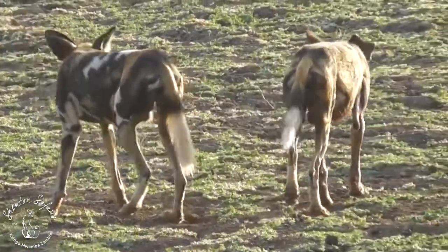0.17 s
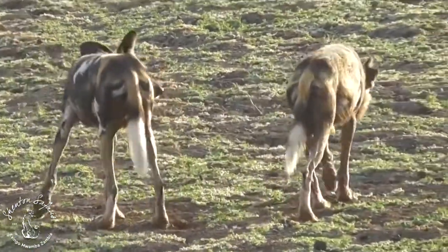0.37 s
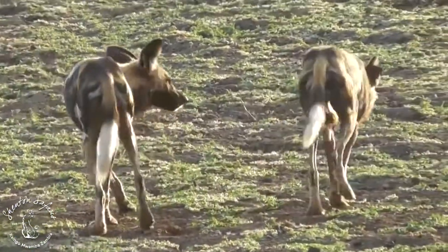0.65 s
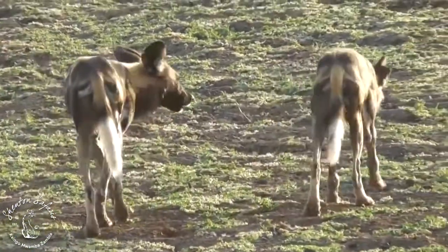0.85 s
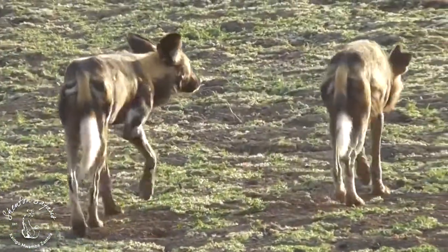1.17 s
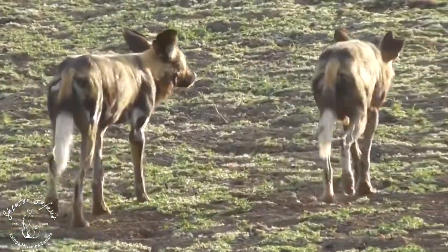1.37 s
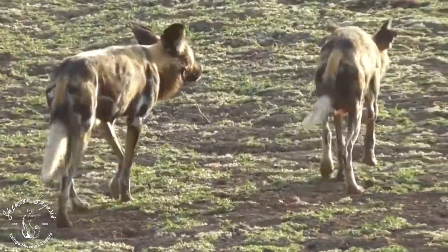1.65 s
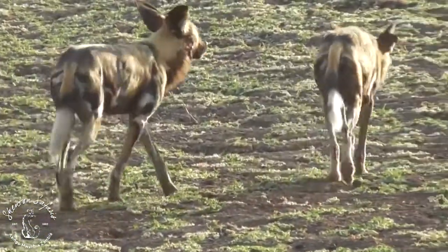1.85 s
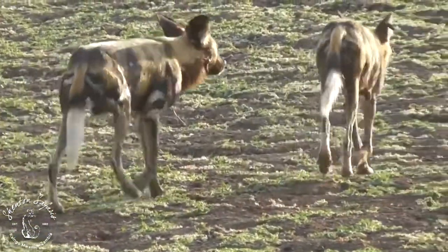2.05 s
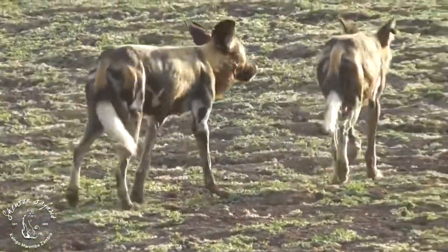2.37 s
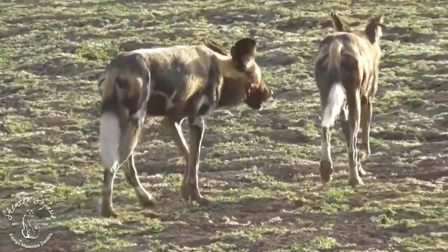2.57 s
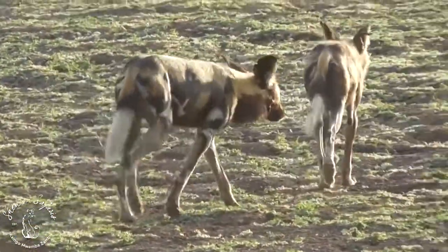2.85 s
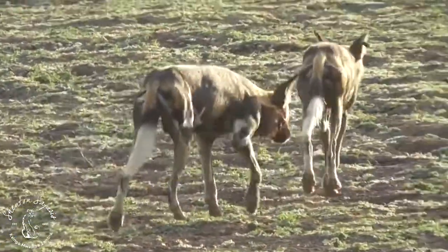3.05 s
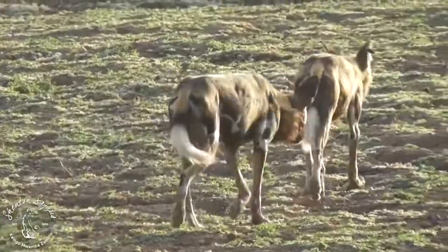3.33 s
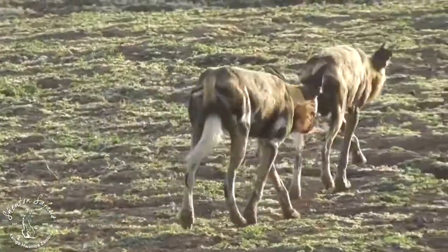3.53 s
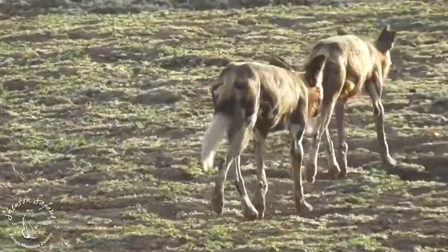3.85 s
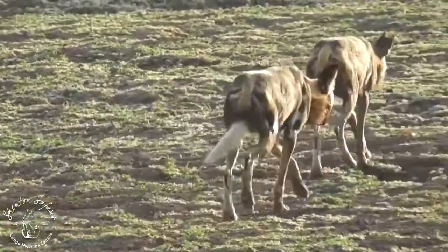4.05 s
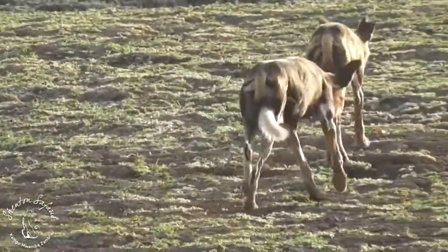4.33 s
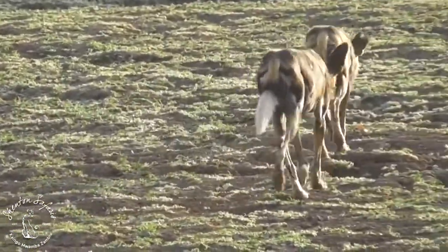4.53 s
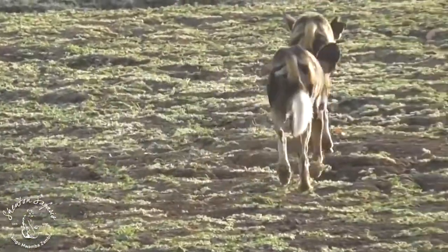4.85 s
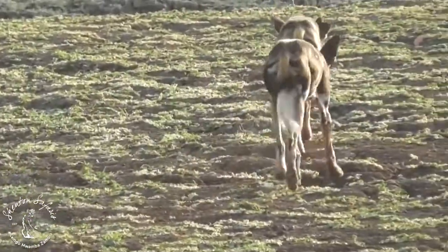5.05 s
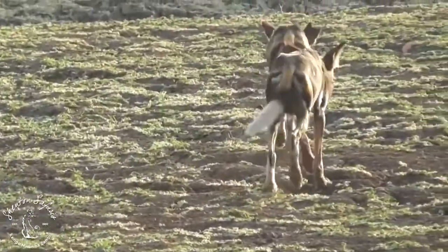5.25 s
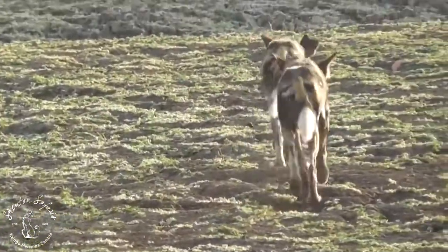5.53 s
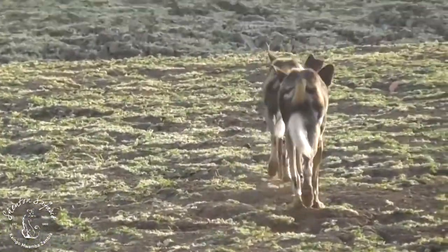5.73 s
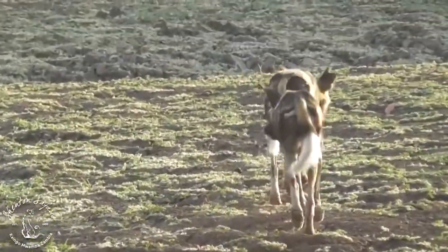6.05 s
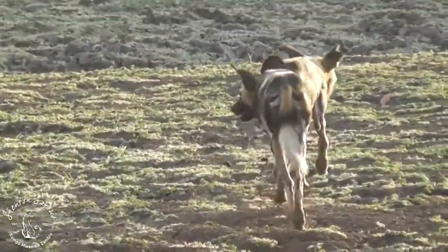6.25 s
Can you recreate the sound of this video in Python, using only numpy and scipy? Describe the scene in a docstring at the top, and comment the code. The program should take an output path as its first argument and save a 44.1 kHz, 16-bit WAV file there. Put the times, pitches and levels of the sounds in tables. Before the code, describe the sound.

Quiet open grassland, heard through a hissy camera microphone while two wild dogs walk away without audible steps. A dove leads throughout: short fluttering coos, breaking from high to low, at about 0, 1.3, 2.6, 3.9 and 5.1 s, each followed by a purring hoot of roughly 0.4 s at 0.4, 1.7, 3.0, 4.3 and 5.5 s. A farther dove answers dimly near 1.0, 2.2, 3.5, 4.7 and 6.1 s, above a blurred dove chorus that dips early and grows later. Small birds whistle at 0.1-0.4, 1.6 and 3.6-3.9 s and chirp sporadically. A nasal whine at 2.0 s leads into harsh squawks until 2.5; more squawks and chirps come at 5.1-5.5, with faint whines near 3.9, 4.5 and 6 s. Very faint low drones pass at 1.8 and 6.0 s. Tiny rapid lens ticks appear around 0.6-1.2, 2.4, 4.7-5.2 and 5.7-6.4 s.

```python
"""Doves over open grassland

A turtle dove repeats a short coo and a long rolled hoot, scattered by bushes; a second answers over a far chorus.
Each dove is a tone switching between a low and a high register. Small birds whistle and chirp with gliding
tones, and whine and squawk with buzz and rasp; a low tone drones far off. Shaped noise makes the air.
The camera adds pulsing hiss and the faint ticks of its lens motor, which ring its body."""
import sys
import numpy as np
from scipy import signal
from scipy.fft import rfft, irfft, next_fast_len
from scipy.io import wavfile
from scipy.ndimage import uniform_filter1d

SR = 44100
rng = np.random.default_rng(int(sys.argv[2]) if len(sys.argv) > 2 else 0)


def waveform_to_disk(signal):
    """Save audio, clipped to [-1, 1], as 16-bit WAV at the path in sys.argv[1]."""
    frames = np.transpose(np.atleast_2d(signal))
    scaled = np.clip(frames, -1, 1) * 32767
    samples = np.round(scaled).astype(np.int16)
    wavfile.write(sys.argv[1], SR, samples)


N = 281799
TIME = np.arange(N) / SR

# The near dove's coos: start_s, level_db
COOS = [(.03, -38.5), (1.311, -38.5), (2.629, -37), (3.882, -38), (5.13, -37)]
# The near dove's rolled hoots: start_s, length_s, roll_hz, pitch_ratio, throb_depth (0 to 1), level_db
HOOTS = [(0.421, 0.4, 33.3, 0.99, 0.38, -39), (1.699, .46, 33.37, 1.003, 0.42, -38.5),
         (2.991, 0.44, 31.77, 0.98, 0.15, -38), (4.268, .42, 33.95, .99, 0.3, -38),
         (5.477, 0.42, 31.62, 0.99, 0.2, -37.5)]
# A second, farther dove's hoots: start_s, level_db
ANSWERS = [(.96, -48.5), (2.22, -49), (3.52, -48.5), (4.72, -52), (6.12, -51.5)]
# Level of the far chorus, which dips and then grows: at_s, level_db
CHORUS_LEVEL = [(0, -51), (1.6, -55), (3, -53), (4.8, -49), (6.39, -48.5)]
# Whistles of a bird to one side: start_s, length_s, pitch_hz, level_db
WHISTLES = [(0.088, 0.079, 2710, -46), (0.317, 0.098, 2370, -49), (1.636, 0.046, 2130, -56),
            (3.625, 0.083, 2597, -49.5), (3.861, 0.109, 2380, -50), (4.638, .075, 2120, -58)]
# Quick slurred chirps, faint twitters and the clear tones that ring out of the squawks:
# start_s, length_s, middle_hz, glide_octaves, bow_octaves, scratch_share, level_db
CHIRPS = [(0.191, 0.025, 2980, -0.48, 0, 0, -55.5), (0.343, 0.021, 3980, -0.1, 0.37, 0.021, -52),
          (0.357, 0.033, 3530, -0.2, 0, 0.098, -51), (0.577, .15, 4060, -0, 0.2, 0.08, -61.5),
          (1.292, 0.1, 4400, -0.34, 0.09, 0.016, -64), (1.392, 0.038, 2380, -0.15, .06, 0.041, -58),
          (1.601, 0.03, 4330, 0, -.03, 0, -59), (1.625, 0.066, 4110, 0.22, 0.17, 0.014, -55.5),
          (2.308, 0.041, 3540, -0.08, 0.075, 0.033, -46), (2.363, 0.053, 2700, 0, 0.0007, 0.0013, -55.5),
          (2.913, 0.024, 3840, -0.06, 0.27, 0.038, -49), (2.922, 0.033, 2600, -.7, 0, 0.093, -55),
          (2.934, .009, 6200, -0.06, 0, 0.064, -56.5), (3.061, 0.042, 2910, 0.58, 0.14, 0.05, -52.5),
          (3.168, .075, 4620, -0.33, 0, .02, -68), (3.365, 0.0365, 2610, 0.4, 0.083, 0.055, -60.5),
          (3.441, 0.023, 2144, 0.4, 0.08, 0.057, -56), (3.48, 0.023, 1430, .06, 0.022, 0, -60),
          (3.741, 0.028, 2730, -0.25, 0, 0, -58), (4.538, 0.051, 3400, .18, .06, 0, -65),
          (4.612, 0.059, 3940, 0.13, 0.11, 0.02, -64), (4.907, 0.057, 3970, 0, 0, 0, -65),
          (5.188, 0.027, 2620, -0.2, 0.023, 0.079, -51.5), (5.205, 0.025, 1930, 0.2, 0.026, .02, -52),
          (5.257, 0.03, 1860, 0.3, 0, 0, -54.5), (5.27, 0.086, 3610, 0.09, 0.2, 0, -53),
          (5.346, 0.049, 1930, -0.3, 0.0067, 0, -50.5), (5.378, .04, 3770, 0, .02, .02, -55),
          (5.958, 0.14, 2890, 0, 0, 0.046, -57.5)]
# Nasal whines: start_s, length_s, middle_hz, glide_octaves, opening_drop_share, level_db, rasp_db
WHINES = [(2.017, 0.19, 1270, -0.32, 0.43, -53, -2.5), (3.886, 0.187, 1260, -0.25, 0.63, -57.5, -2),
          (4.518, 0.27, 1180, -0.17, 0.42, -64.5, 5), (5.907, 0.24, 1420, 0, 0.1, -64.5, -2),
          (6.134, 0.2, 1250, -.36, 0.014, -55.5, 0.5)]
# Harsh arched squawks: start_s, length_s, top_hz, bow_octaves, level_db, rasp_db, shrillness_db
SQUAWKS = [(2.164, 0.23, 487, 0.56, -49, 1, 1), (2.251, 0.22, 445.3, .3, -50.5, 0, -21),
           (5.091, 0.21, 650, .45, -56, 3, -10), (5.234, .172, 455, 0.56, -54, -12, -8),
           (5.305, 0.15, 472.3, .2, -53.5, 0, -4)]
# Throat that shapes the whines: frequency_hz, gain_db
WHINE_THROAT = [(700, -18), (1350, 0), (1600, -7), (2050, -5.5), (2800, 0), (3600, 0.5), (4300, 0),
                (4900, -16.5), (9000, -13)]
# Open beak that shapes the squawks: frequency_hz, gain_db
SQUAWK_BEAK = [(700, -10), (1350, 5.5), (1600, -17), (1950, 0), (2400, -2), (2900, -4), (3600, 1),
               (4500, -1.5), (5000, -5), (9000, -14.5)]
# Shrill top added to strained cries: frequency_hz, gain_db
SHRILL_TOP = [(3500, -1), (5000, -17), (6600, 1.5), (7700, 6), (8700, 2), (10000, -36), (14000, -45)]
# Low far-off drones: start_s, length_s, pitch_hz, level_db
DRONES = [(1.84, 0.61, 175.1, -59), (6.0, 0.415, 200.8, -61.5)]
# Runs of the lens motor: start_s, end_s, hard_step_share (0 to 1), relative_level_db
MOTOR_RUNS = [(0.614, 0.81, .5, -72.5), (0.837, .94, 1, -72), (0.984, 1.19, 0.58, -75),
              (2.355, 2.556, 1, -70), (4.657, 4.99, .4, -72), (5.036, 5.19, .3, -69.5),
              (5.716, 5.93, .3, -71.5), (6.057, 6.367, .6, -68.5)]
# Resonances of the camera body: frequency_hz, width_hz, gain_db
CAMERA_BODY = [(1312, 52, 21), (1992, 100, 19.5), (3210, 70, 8), (3940, 160, -4), (5540, 200, 5.5)]
# Tone balance of the distant air: frequency_hz, relative_level_db
AIR_SPECTRUM = [(13, -59), (22, -6.5), (48, 2.5), (81, -3.5), (177, -3.5), (270, -3), (399, -1), (530, -2),
                (560, -1.5), (730, 6), (1230, -120)]
# Level of the distant air over time: at_s, level_db
AIR_LEVEL = [(0, -57.5), (1.7, -59), (2.1, -54), (3.1, -57), (3.8, -56), (4.25, -57.5), (5.55, -56.5),
             (6.39, -57)]
# Tone balance of the microphone hiss: frequency_hz, relative_level_db
HISS_SPECTRUM = [(680, -34), (1150, -0.5), (1280, -4), (1450, -4.5), (1600, -7.5), (1820, -5), (2100, 0.5),
                 (2810, -10), (3580, -4), (4960, -15.5), (7760, -7.5), (8290, -4.5), (9650, -7),
                 (15100, -9.5), (15600, -6.5)]
# Stereo width of air and hiss: frequency_hz, side_minus_mid_db
STEREO_WIDTH = [(60, 5), (110, 7), (200, 8), (380, 5.5), (700, -5), (1290, 1.5), (2380, -43.5), (4400, -83),
                (8120, -12), (15000, 1)]

# low register shared by coo and hoot, before each note's own pitch ratio
LOW_HZ = 756.8
# coo: its length, its leap to the high register, its break back down
COO_S, LEAP_S, BREAK_S = 0.1544, 0.00783, .084
# pitch at the ends and top of the coo's arch; after the break the low register sags and fades
COO_EDGE_HZ, COO_TOP_HZ, COO_SAG_HZ_PER_S, COO_FADE_DB_PER_S = 885, 985, 650, 162
# extra strength as a coo opens
PUSH_DB, PUSH_S = 1.5, 0.046
# hoot: the high register sinks from first to last; the low one scoops up into the note
HIGH_FIRST_HZ, HIGH_LAST_HZ = 1018.5, 876.4
SCOOP_SHARE, SCOOP_S = 0.087, 0.0081
# the hoot swells from this far down, and has an attack and a release
SWELL_DB, SWELL_S = -3, 0.18
HOOT_ATTACK_S, HOOT_RELEASE_S = .007, .06
# early in a hoot the low register tenses: it goes sharp and weak between two moments
TENSE_HZ, TENSE_DB, TENSE_FROM_S, TENSE_TO_S = 150.6, -1, 0.02174, .082
# both registers droop as a hoot closes
CLOSE_S, LOW_DROOP_HZ, HIGH_DROOP_HZ = 0.0495, 28.4, 70.8
# lead given to the low register, and growth of the flicks through the hoot
LOW_LEAD_DB, FLICK_GROWTH_DB = 2, 4
# the roll starts this much faster, then settles; its pulses come unevenly (radians of the cycle)
ROLL_RUSH_HZ, ROLL_SETTLE_S, ROLL_JITTER_RAD = 9, .09, .5
# each flick falls and has its own pitch (shares of pitch); pulses differ in strength
FLICK_FALL, FLICK_SCATTER, UNEVEN_DB = .03, .02, 1.8
# whistles start with an unsteady pitch and slide up (shares of pitch)
WHISTLE_SCRATCH, WHISTLE_SLIDE, WHISTLE_SLIDE_S = .045, 0.147, 0.0181
# whines drop from a high start and sag at the end (share of pitch)
WHINE_DROP_S, WHINE_SAG, WHINE_SAG_S = .022, 0.16, .025
# pitch unrest of whines and squawks (shares), and level unrest of their rasp
WHINE_JITTER, SQUAWK_JITTER, RASP_GRAIN_DB = .018, .01, 1.5
# motor steps come slightly early or late
STEP_JITTER_S = .001
# hiss level, the pulse of the camera's electronics in it, and the camera's upper limit
HISS_DB, PULSE_HZ, TOP_HZ = -57, 50, 15750


def undb(db):
    """Turn decibels into gain."""
    return 10 ** (np.asarray(db) / 20)


def unit(x):
    """Scale to an average (rms) strength of 1."""
    return x / np.sqrt(np.mean(x ** 2) + 1e-20)


def curve(rows, at):
    """Join the columns of a table by straight lines."""
    where, *columns = np.transpose(rows)
    return [np.interp(at, where, column) for column in columns]


def add(track, s, sound):
    """Mix a sound into a track at time s."""
    i = max(int(s * SR), 0)
    part = sound[:max(N - i, 0)]
    track[i:i + len(part)] += part


def colour(x, response):
    """Filter a sound by a gain given for each frequency."""
    n = x.shape[-1]
    size = next_fast_len(n + 4096, True)
    hz = np.fft.rfftfreq(size, 1 / SR) + 1e-3
    return irfft(rfft(x, size) * response(hz), size)[..., :n]


def walk(rate_hz, n=N):
    """Wander smoothly at random, by low-passing noise to a spread of 1."""
    noise = rng.standard_normal(N)
    return unit(colour(noise, lambda f: 1 / (1 + (f / rate_hz) ** 4)))[:n]


def luck(at, count=40):
    """Draw a new random value at each whole step and join them by straight lines."""
    return np.interp(at, np.arange(count), rng.standard_normal(count))


def slope(points, f):
    """Read gain from (Hz, dB) points, joined on a log-frequency axis."""
    hz, db = np.transpose(points)
    return undb(np.interp(np.log(f), np.log(hz), db))


def ring(x, modes):
    """Let a sound excite resonances given as (Hz, width Hz, dB)."""
    total = 0
    for hz, width, db in modes:
        b, a = signal.iirpeak(min(hz, SR * .45), hz / width, SR)
        total = total + undb(db) * signal.lfilter(b, a, x)
    return total


def turn(hz):
    """Add up a moving pitch into phase."""
    return 2 * np.pi * np.cumsum(hz) / SR


def step(x):
    """Switch smoothly from 0 to 1 as x passes zero."""
    return (1 + np.tanh(x)) / 2


def fade(t, attack_s, release_s):
    """Rise, hold and fall over the times t."""
    return np.clip(t / attack_s, 0, 1) * np.clip((t[-1] - t) / release_s, 0, 1)


def place(x, pan_db):
    """Set a sound between left and right by a level difference."""
    return x * undb(np.array([[pan_db], [-pan_db]]) / 2)


def bushes(x, t60, spread, echoes_hz=900):
    """Many weak echoes from scrub and trees, dying by 60 dB in t60 seconds, partly different in each ear."""
    t = TIME[:SR]
    strengths = rng.standard_normal((2, SR))
    present = rng.random((2, SR)) < echoes_hz / SR
    taps = strengths * present * undb(-60 * t / t60) * (t > .003)
    taps = taps / np.sqrt(np.sum(taps ** 2, axis=1, keepdims=True))
    mid, side = signal.fftconvolve(x[None], taps, axes=1)[:, :N]
    return mid + spread * side * np.array([[1], [-1]])


def arch(length, middle, glide, bow, taper):
    """Pitch that glides and bows (octaves) about its middle; rise and fall together take the share taper."""
    u = np.linspace(-1, 1, int(length * SR))
    hz = middle * 2 ** (glide * u / 2 - bow * u ** 2)
    return hz, signal.windows.tukey(len(u), min(taper, 1))


def wash(points, db):
    """Noise of a given tone balance and level, with a stereo width that depends on frequency."""
    mid, side = colour(rng.standard_normal((2, N)), lambda f: slope(points, f))
    side = colour(unit(side), lambda f: slope(STEREO_WIDTH, f))
    return undb(db) * (unit(mid) + side * np.array([[1], [-1]]))


def camera_hiss(pulse=0.29, pulse_s=0.0067):
    """Steady microphone hiss, faintly pulsed by the camera's electronics."""
    pulses = 1 + pulse * np.exp(-(TIME % (1 / PULSE_HZ)) / pulse_s)
    return wash(HISS_SPECTRUM, HISS_DB) * pulses / np.mean(pulses)


def push(t):
    """Extra strength that opens a coo and is quickly spent."""
    return undb(PUSH_DB * np.exp(-(t / PUSH_S) ** 4))


def coo(pitch, waver, switch_s=0.0033, high_db=-2.0, low_db=2.0, flutter=0.48, flutter_hz=43, warble=0.056):
    """A fluttering note that leaps to the high register, arches, then breaks down into the low one and fades."""
    t = TIME[:int(COO_S * SR)]
    up = step((t - LEAP_S) / switch_s) * step((BREAK_S - t) / switch_s)
    after = np.maximum(t - BREAK_S, 0)
    beat = np.sin(2 * np.pi * flutter_hz * t)
    rise = np.sin(np.pi * (t - LEAP_S) / (BREAK_S - LEAP_S))
    high = COO_EDGE_HZ + (COO_TOP_HZ - COO_EDGE_HZ) * rise
    low = LOW_HZ - COO_SAG_HZ_PER_S * after
    hz = up * high * (1 + warble * beat) + (1 - up) * low
    db = high_db + (low_db - high_db) * (t > BREAK_S) * (1 - up) - COO_FADE_DB_PER_S * after
    tone = np.sin(turn(hz * pitch * waver[:len(t)]))
    return undb(db) * (1 + flutter * beat) * push(t) * fade(t, 0.008, 0.011) * tone


def hoot(length, roll_hz, pitch, waver, pump=0.4, snap=1.26, bias=0.12, hold=0.24, flick=.05, unrest=1.3,
         low_db=0, high_db=2.5):
    """A low tone, interrupted once each roll cycle by a falling flick of the high register; both droop at the end."""
    t = TIME[:int(length * SR)]
    along, wobble = t / length, waver[:len(t)] - 1
    scoop = 1 - SCOOP_SHARE * np.exp(-t / SCOOP_S)
    closing = np.exp((t - length) / CLOSE_S)
    tense = step((t - TENSE_FROM_S) / 0.0085) * step((TENSE_TO_S - t) / 0.014)
    low = pitch * scoop * (LOW_HZ + TENSE_HZ * tense - LOW_DROOP_HZ * closing)
    sinking = HIGH_FIRST_HZ + (HIGH_LAST_HZ - HIGH_FIRST_HZ) * along
    high = pitch * (sinking - HIGH_DROOP_HZ * closing)
    cycle = turn(roll_hz + ROLL_RUSH_HZ * np.exp(-t / ROLL_SETTLE_S)) + ROLL_JITTER_RAD * luck(t * roll_hz)
    # the note opens low; the first flick comes one cycle in
    up = step(snap * (np.cos(cycle) - bias)) * step(cycle - np.pi)
    # the swollen throat keeps the low tone ringing through each flick
    under_gain = undb(LOW_LEAD_DB + low_db + TENSE_DB * tense) * (1 - (1 - hold) * up)
    under = under_gain * np.sin(turn(low * (1 + 0.84 * wobble)))
    bend = flick * (np.cos(cycle) - .8) - FLICK_FALL * np.sin(cycle) + FLICK_SCATTER * luck(t * roll_hz)
    over_gain = undb(high_db + FLICK_GROWTH_DB * (along - .5)) * up
    over = over_gain * np.sin(turn(high * (1 + unrest * wobble + bend)))
    # pressure builds up to each flick and sags after it; pulse strengths vary at random
    throb = (1 - pump * np.sin(cycle)) * undb(UNEVEN_DB * luck(cycle / np.pi))
    effort = undb(SWELL_DB * np.maximum(1 - (t / SWELL_S) ** 2, 0))
    return (under + over) * throb * effort * fade(t, HOOT_ATTACK_S, HOOT_RELEASE_S)


def far_band(f):
    """The narrow band in which distant doves carry."""
    return 1 / np.sqrt(1 + ((f - 845) / 115) ** 6)


def far_doves(count=30, pitch=.98):
    """Many doves sing coos and hoots; echoes and evened loudness melt them into a murmur."""
    voices, waver = np.zeros(N), 1 + 0.02 * walk(190)
    # slow pitch drift keeps a steady tone from building up
    waver = waver + .035 * walk(10)
    for k, (late, own, roll) in enumerate(rng.uniform(-1, 1, (count, 3))):
        s = (k + late / 2) * N / SR / count
        add(voices, s, hoot(.4, 33 + 2 * roll, pitch + .1 * own, waver[k * 1000:], low_db=-6))
        add(voices, (s + 0.97) % (N / SR), coo(pitch + 0.084 * own, waver))
    # the murmur is already under way at the start
    voices = np.roll(voices, N // 2)
    sound = colour(bushes(voices, t60=.6, spread=.4), far_band)
    power = uniform_filter1d(np.mean(sound ** 2, axis=0), SR // 8)
    even = sound / np.sqrt(power + 1e-9)
    db, = curve(CHORUS_LEVEL, TIME)
    return place(even * undb(db), pan_db=0.5)


def near_dove(tail_db=-13):
    """Coo and hoot in turn, blurred by close scrub and trailed by echoes from the tree line."""
    voice = np.zeros(N)
    # the voice trembles quickly and drifts slowly
    waver = 1 + .017 * walk(170) + .011 * walk(14)
    for s, db in COOS:
        add(voice, s, undb(db) * coo(1, waver[int(s * SR):]))
    for s, length, roll_hz, pitch, pump, db in HOOTS:
        add(voice, s, undb(db) * hoot(length, roll_hz, pitch, waver[int(s * SR):], pump))
    close = voice + undb(-9) * bushes(voice, t60=.08, spread=.5)
    sound = close + undb(tail_db) * bushes(voice, t60=0.79, spread=0.092)
    # keep only the band of the dove's voice
    banded = colour(sound, lambda f: 1 / (1 + (f / 1170) ** 18) / (1 + (615 / f) ** 20))
    return place(banded, pan_db=2.6)


def whistler(jitter=0.014, settle_s=0.025, echo_db=-8):
    """Tones whose pitch starts scratchy, slides up and settles, with an echo."""
    voice, waver = np.zeros(N), walk(510)
    for s, length, pitch, db in WHISTLES:
        t = TIME[:int(length * SR)]
        unrest = (jitter + WHISTLE_SCRATCH * np.exp(-t / settle_s)) * waver[int(s * SR):][:len(t)]
        hz = pitch * (1 + unrest - WHISTLE_SLIDE * np.exp(-t / WHISTLE_SLIDE_S))
        add(voice, s, undb(db) * fade(t, 0.019, 0.0051) * np.sin(turn(hz)))
    return place(voice + undb(echo_db) * bushes(voice, t60=0.91, spread=0.029), pan_db=-3.0)


def chirpers(echo_db=-7, taper=0.31):
    """Quick gliding tones, some pure and some with a scratchy pitch, with an echo."""
    voice, waver = np.zeros(N), walk(560)
    for s, length, middle, glide, bow, scratch, db in CHIRPS:
        hz, swell = arch(length, middle, glide, bow, taper)
        unrest = scratch * waver[int(s * SR):][:len(hz)]
        add(voice, s, undb(db) * swell * np.sin(turn(hz * (1 + unrest))))
    return place(voice + undb(echo_db) * bushes(voice, t60=0.42, spread=0.028), pan_db=0.0)


def lens_motor(knock_db=40, soft_db=-7):
    """The focus motor steps fifty times a second, hard or softly; each step rings the camera body."""
    steps = np.zeros(N)
    for (start, end, share, db), draws in zip(MOTOR_RUNS, rng.random((len(MOTOR_RUNS), 40, 3))):
        for s, (hard, force, late) in zip(np.arange(start, end, 1 / 50), draws):
            soft = s > start and hard > share  # a run always starts hard
            knock = undb(db + knock_db + soft_db * soft + 2 * force)
            add(steps, s + STEP_JITTER_S * (late - .5), np.array([knock]))
    return ring(steps, CAMERA_BODY)


def answering_dove(length=0.43, roll_hz=32, pitch=0.93):
    """A second dove whose hoots arrive only as echo, with the high register carrying best."""
    voice, waver = np.zeros(N), 1 + 0.0357 * walk(145.0)
    for s, db in ANSWERS:
        own_waver = np.roll(waver, -int(s * SR))
        add(voice, s, undb(db) * hoot(length, roll_hz, pitch, own_waver, low_db=-4.5, high_db=9.0))
    return place(colour(bushes(voice, t60=0.45, spread=0.076), far_band), pan_db=-2.5)


def drone(glide=-0.11, waver=0.098):
    """Low, far-off tones that sag in pitch and waver, with a strong echo."""
    voice = np.zeros(N)
    for s, length, pitch, db in DRONES:
        hz, swell = arch(length, pitch, glide, 0, taper=0.65)
        add(voice, s, undb(db) * swell * np.sin(turn(hz * (1 + waver * walk(64, len(hz))))))
    return voice + bushes(voice, t60=0.58, spread=0.47)


def whine_arch(length, middle, glide, drop, taper=0.2):
    """Pitch and envelope of a whine: it drops from a high start, glides, and gives way at the end."""
    hz, swell = arch(length, middle, glide, 0, taper)
    t = TIME[:len(hz)]
    opening = 1 + drop * np.exp(-t / WHINE_DROP_S)
    ending = 1 - WHINE_SAG * np.exp((t - length) / WHINE_SAG_S)
    return hz * opening * ending, swell


def cry(hz, swell, throat, rasp_db, shrill_db, jitter, fundamental_db=-12, count=24):
    """Harmonic buzz and grainy, pulsed rasp through a small bird's throat; strain adds a shrill top."""
    def shape(f):
        """Gain of the throat plus the shrill top."""
        return slope(throat, f) + undb(shrill_db) * slope(SHRILL_TOP, f)

    noise = rng.standard_normal(N)[:len(hz)] * undb(RASP_GRAIN_DB * walk(65, len(hz)))
    phase = turn(hz * (1 + jitter * walk(213, len(hz))))
    offsets = rng.uniform(0, 2 * np.pi, count + 1)
    buzz = np.zeros(len(hz))
    for k in range(1, count + 1):
        if k * hz.mean() < SR / 4:
            gain = shape(k * hz) * undb(fundamental_db * (k == 1))
            buzz += gain * np.sin(k * phase + offsets[k])
    rasp = colour(noise * (1 + np.cos(phase)), shape)
    return swell * unit(unit(buzz) + undb(rasp_db) * unit(rasp))


def squawkers(whine_echo_db=-5, squawk_echo_db=-8, whine_shrill_db=-30, squawk_taper=0.77):
    """Nasal whines and arched squawks made of buzz and rasp, with an echo from the scrub."""
    whines, squawks = np.zeros(N), np.zeros(N)
    for s, length, middle, glide, drop, db, rasp_db in WHINES:
        hz, swell = whine_arch(length, middle, glide, drop)
        add(whines, s, undb(db) * cry(hz, swell, WHINE_THROAT, rasp_db, whine_shrill_db, WHINE_JITTER))
    for s, length, top, bow, db, rasp_db, shrill_db in SQUAWKS:
        hz, swell = arch(length, top, 0, bow, squawk_taper)
        add(squawks, s, undb(db) * cry(hz, swell, SQUAWK_BEAK, rasp_db, shrill_db, SQUAWK_JITTER))
    direct = place(whines, pan_db=.5) + place(squawks, pan_db=-2.2)
    to_scrub = undb(whine_echo_db) * whines + undb(squawk_echo_db) * squawks
    return direct + bushes(to_scrub, t60=0.84, spread=0.017)


def scene():
    """Birds near and far over the quiet plain, with the camera's own noises."""
    air_db, = curve(AIR_LEVEL, TIME)
    doves = near_dove() + answering_dove() + far_doves()
    small_birds = whistler() + chirpers() + squawkers()
    background = drone() + wash(AIR_SPECTRUM, air_db)
    camera = lens_motor() + camera_hiss()
    return doves + small_birds + background + camera


def record(dry):
    """The camera cuts the top steeply, by an elliptic low-pass filter."""
    return signal.sosfilt(signal.ellip(10, .1, 70, TOP_HZ, fs=SR, output="sos"), dry)


dry = scene()
out = record(dry)
waveform_to_disk(out)
```